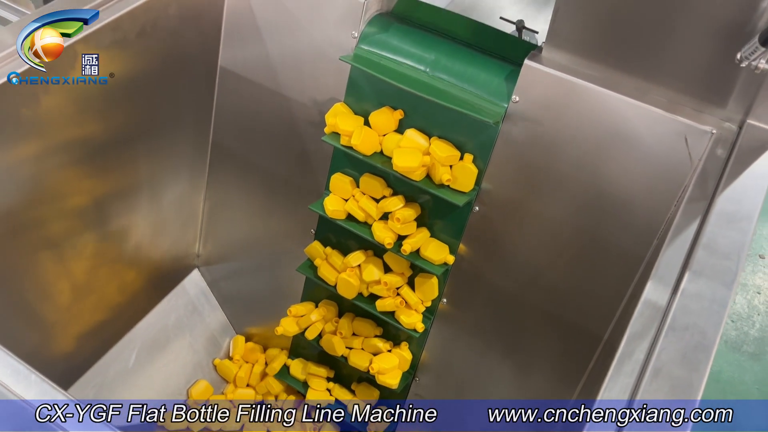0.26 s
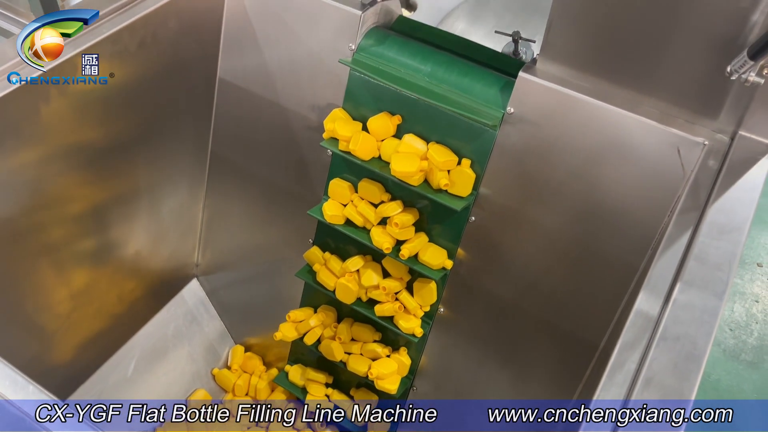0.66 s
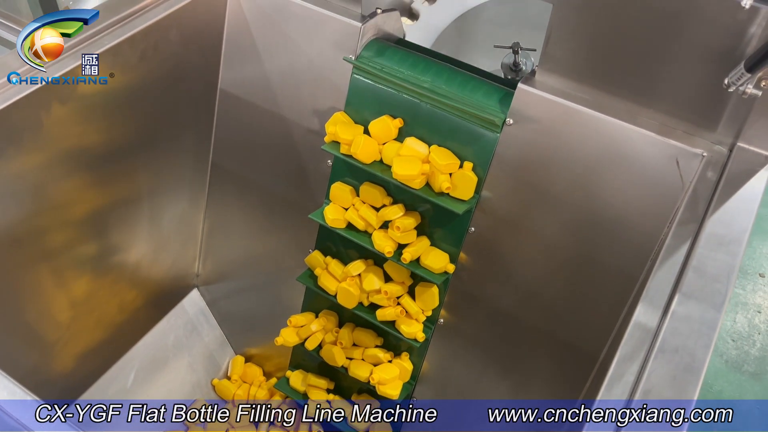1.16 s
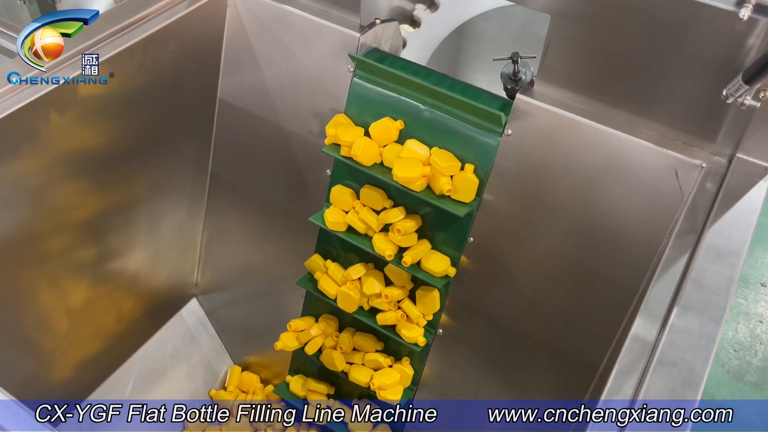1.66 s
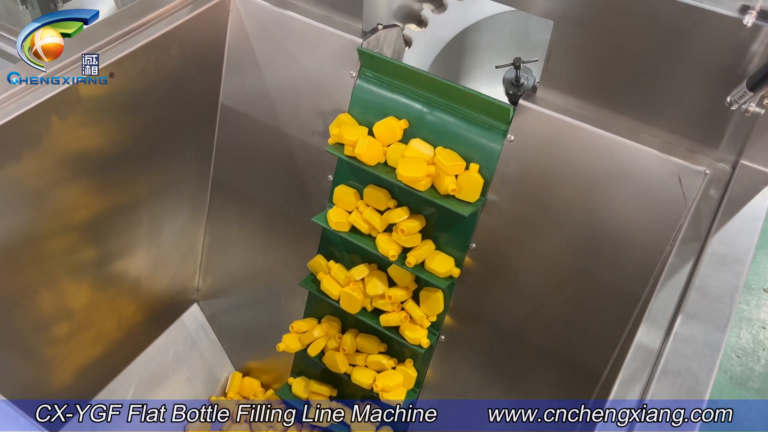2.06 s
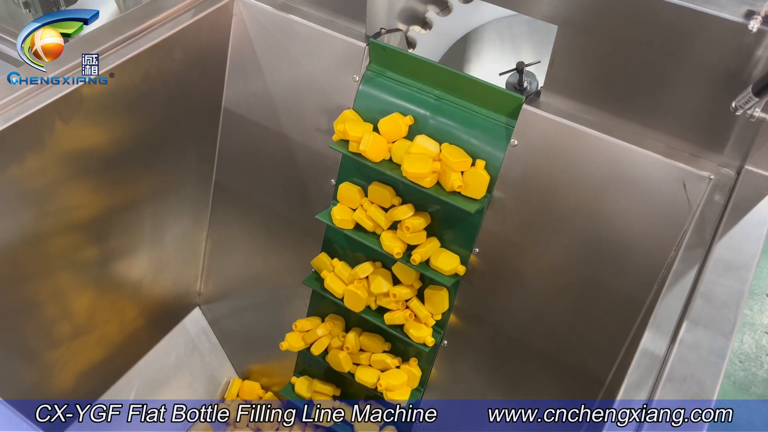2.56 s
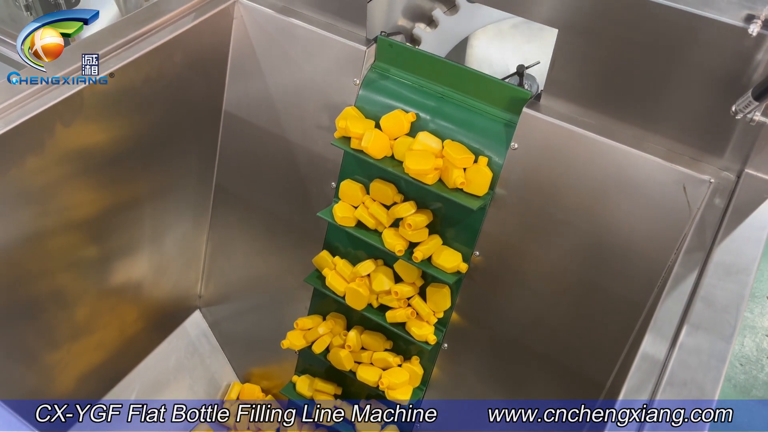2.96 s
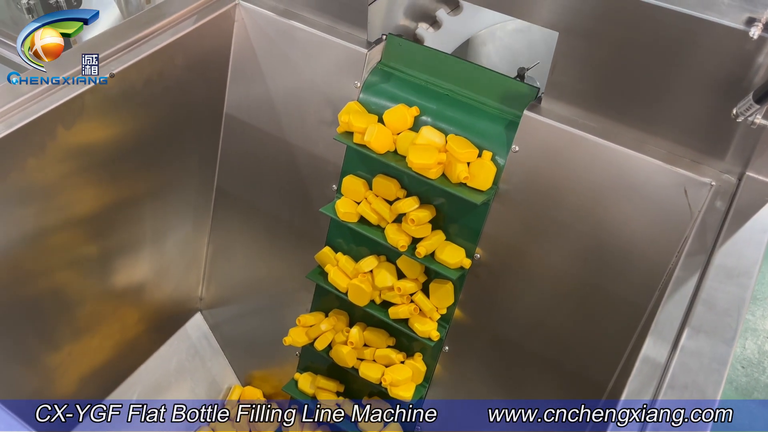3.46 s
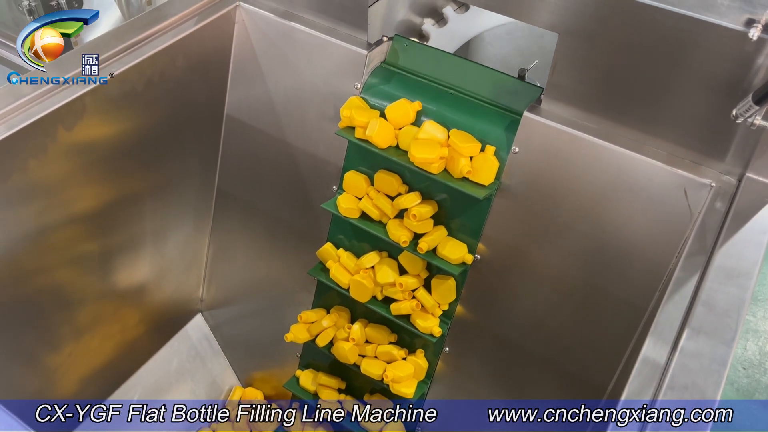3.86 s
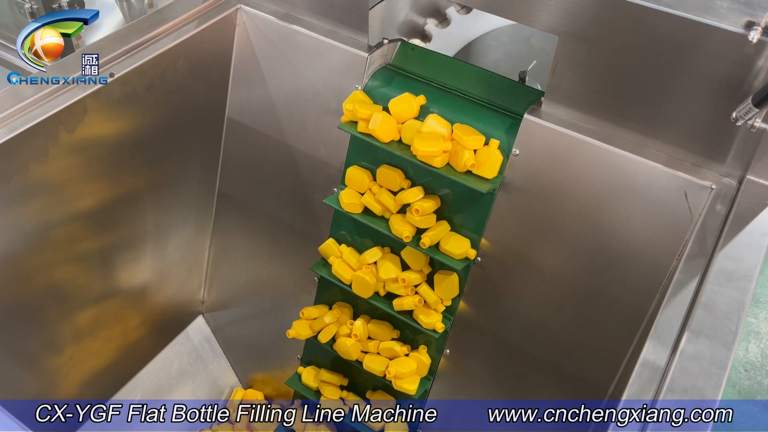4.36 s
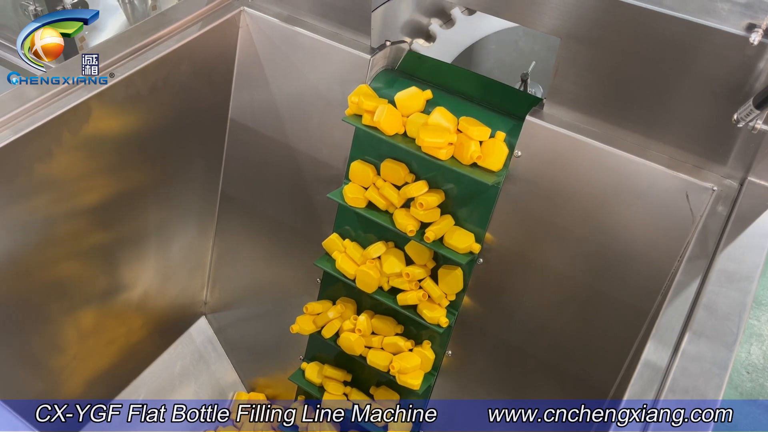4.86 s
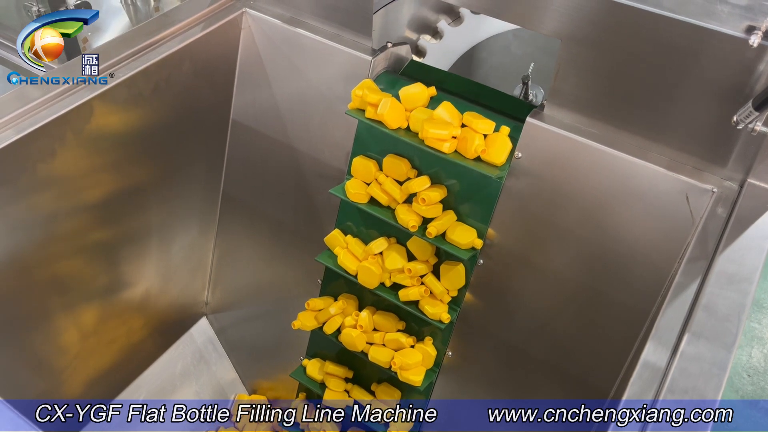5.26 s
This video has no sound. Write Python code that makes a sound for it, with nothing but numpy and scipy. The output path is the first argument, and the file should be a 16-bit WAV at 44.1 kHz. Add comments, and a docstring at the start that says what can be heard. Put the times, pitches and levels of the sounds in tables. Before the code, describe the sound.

Close stereo pickup at a metal hopper: light empty plastic containers knock, click and ring briefly, their heap slipping most strongly in the middle and drumming on the steel walls. Clatter drops away, then returns in a weaker cluster before the end. Behind it are sharp compressed-air hiss, a very high faint whistle for the first two seconds, belt drone and hall rumble.

```python
"""In a factory hall, a cleated belt lifts small plastic bottles out of a steel hopper.
Bottles clack, click and ring as noise grains and decaying sines; the heap slips, most strongly midway,
as a patter of random contacts, drumming on sheet-steel walls that resonate in narrow modes.
Behind them are a belt drone and hall murmur of coloured noise, a drive hum of wavering sines,
and a hiss of compressed air with a thin whistle of narrow-band noise for the first two seconds."""
import sys
import numpy as np
from scipy import signal
from scipy.fft import rfft, irfft, next_fast_len
from scipy.io import wavfile
from scipy.ndimage import map_coordinates

SR = 44100
rng = np.random.default_rng(int(sys.argv[2]) if len(sys.argv) > 2 else 0)


def generate_wav(signal):
    """Clip the signal to [-1, 1] and save it as 16-bit WAV at the path in sys.argv[1]."""
    frames = np.transpose(np.atleast_2d(signal))
    scaled = np.clip(frames, -1, 1) * 32767
    pcm = np.round(scaled).astype(np.int16)
    wavfile.write(sys.argv[1], SR, pcm)


N = 242991  # samples

# Levels are set ahead of the mix; the spectra only shape the tone, as each noise is scaled to rms 1.
# Bottle knocks: start_s, level_db, pitch_hz, ring_db (over the level), body_db (low-mid boost),
# click_db, click_hz
KNOCKS = [(0.186, -18.5, 2290, -1, -11, -33, 3570), (0.312, -12.5, 1656, -2, 4.5, -29, 3400),
          (0.399, -15, 3800, -12, 4, -22, 3870), (0.429, -17, 2690, -2, 6, -28, 3380),
          (0.448, -4, 1460, -7.5, -10, -19, 3530), (0.457, -11, 2076, -1, 15, -40, 3380),
          (0.469, -10.5, 1392, -1.5, 3, -40, 3360), (0.717, -15, 1730, -4.5, 0, -28, 4890),
          (1.084, -25, 1880, -12, 0, -45, 5000), (1.097, -16.5, 2026, -6, 9, -47, 6520),
          (1.403, -21, 1270, -17, -11, -35, 4500), (1.495, -12.5, 830, -5.5, 2, -27, 4040),
          (1.562, -20, 1650, 2, 16, -45, 6910), (1.613, -22.5, 980, 1, 12, -45, 7130),
          (1.768, -15.5, 2113, 7.5, 11, -41, 6850), (1.793, -12, 2800, -6, 22, -38, 6680),
          (1.827, -8.5, 877, -14, -1, -33, 3510), (1.858, -19.5, 2053, 5, -5, -34, 4500),
          (1.919, -8.5, 2474, -5.5, 8, -35, 6570), (1.933, -6, 2820, -9, -3, -22, 4630),
          (1.969, -20, 1015, 3, -10, -26, 6720), (2.031, -13.5, 2730, 4.5, -14, -24, 5860),
          (2.107, -6, 2050, 2.5, 2, -20.5, 4350), (2.132, -14.5, 2547, 2.5, -6, -27, 4400),
          (2.178, -9, 2740, -1, 0, -16.5, 3700), (2.237, -5.5, 2754, 1, -3, -13.5, 5840),
          (2.298, -9, 885, 4, -6, -21, 4960), (2.312, -5.5, 2240, -1, -5, -16, 6640),
          (2.334, -5, 2530, -6, 5, -17, 4130), (2.346, -4.5, 1253, -11, 0, -29, 6800),
          (2.388, -7, 2200, -13, -4, -21, 6600), (2.402, -9.5, 1960, -5, 3, -29, 4800),
          (2.455, -8.5, 2735, -4, -13, -22, 5340), (2.546, -8.5, 2076, 7, 7, -19, 4870),
          (2.577, -1.5, 1430, -21, -3, -19, 3600), (2.655, -10, 2150, -10, 19, -21, 4870),
          (2.68, -5, 2000, -6, 2, -19, 4480), (2.695, -9, 2100, -11, 1, -30, 4520),
          (2.726, -3.5, 2200, -5, -10, -30, 7040), (2.746, -8.5, 2650, 2, 6, -12, 4440),
          (2.797, -6.5, 1050, -10.5, -1, -21, 4000), (2.846, -4, 1260, -20, 8, -21, 3540),
          (2.868, -16, 1440, 0, -8, -38, 4450), (2.908, -13, 2110, 1, 8, -32, 4580),
          (2.923, -4, 1063, -13, 2, -22, 6610), (2.954, -0.5, 877, -18, -0.5, -28, 4940),
          (2.965, -11.5, 2240, 2.5, 1, -18, 4620), (2.982, -16, 907, -1, -9, -16.5, 3480),
          (3.042, -21, 2710, 4, 0, -34, 6070), (3.078, -15, 1113, 1.5, 6, -21, 3600),
          (3.133, -8.5, 1960, -13, -4, -34, 4300), (3.165, -33, 2140, 0, 12, -40, 4940),
          (4.106, -14.5, 2980, -0.5, 12, -26, 5180), (4.133, -12.5, 2180, -3.5, 14, -28, 4100),
          (4.512, -14, 1370, -19, 2, -46, 6480), (4.535, -14, 2130, -5, 20, -23.5, 4630),
          (4.626, -5.5, 2055, -15, 11, -26, 4330), (4.672, -10.5, 2120, -6, 14, -36, 4870),
          (4.735, -18.5, 1434, -13.5, -7, -33, 6720), (4.825, -11.5, 2080, -13, 9.5, -44, 4760),
          (4.853, -15.5, 1390, -9, -3, -28, 3460), (4.9, -16, 2550, -3, 7, -43, 5580),
          (4.935, -19, 2620, -5, 5, -44, 4950), (5.006, -22, 2000, -3, 25, -37, 4550),
          (5.046, -21.5, 1680, 2, 19, -28, 4950), (5.067, -21.5, 1437, -2.5, -7, -38, 4890),
          (5.279, -23.5, 1470, -11, 15, -30, 6400)]
# Bottles rocking on the steel: start_s, length_s, pitch_hz, contact_db (centre of a random spread)
RATTLES = [(.53, .16, 1437, -35.5), (2.029, .045, 2680, -20), (2.178, .04, 2690, -11.5),
           (2.18, .16, 915, -24.5), (2.657, .08, 2080, -14), (3.118, .07, 912, -17.5),
           (3.132, .055, 2070, -20), (3.135, .06, 2570, -23.5), (4.904, .08, 2625, -33)]
# Slips of the heap: start_s, length_s, motion_db
SLIPS = [(0.49, 0.3, -37.5), (1.548, 0.62, -30), (1.757, 0.37, -23), (2.135, 0.68, -20.5),
         (2.302, 0.12, -19.5), (2.556, 0.23, -18.5), (2.819, 0.17, -19.5), (3.017, 0.1, -24.5),
         (3.327, 0.083, -36.5), (3.99, 0.086, -34), (4.619, 0.12, -29), (4.84, 0.26, -32)]
# Clumps landing on the hopper wall: start_s, level_db, sheet_hz, ring_db
LANDINGS = [(0.315, -31.5, 256.7, -30.5), (0.452, -36, 253, -58), (0.723, -31.5, 107, -26),
            (1.57, -25.5, 234, -30.5), (1.829, -19, 224, -40), (1.92, -27, 192, -26),
            (2.355, -18.5, 394, -21.5), (2.588, -18.5, 258, -20.5), (2.861, -19.5, 232, -35),
            (2.95, -16, 408, -20), (3.126, -26.5, 397, -28), (4.644, -25.5, 260.4, -24),
            (4.845, -27, 256.4, -25), (5.058, -27.5, 255.7, -25)]
# Body modes of the empty bottles: pitch_hz, level_db (relative)
BOTTLE_MODES = [(900, 2), (1070, 0), (1290, 1.5), (1480, 5), (1940, 2.5), (2090, 7), (2200, 1), (2720, 5.5)]
# Ringing modes of the hopper's steel sheets: pitch_hz, level_db (ahead of the hopper's gain)
STEEL_MODES = [(160, -51), (188, -38), (234, -40.5), (260, -37), (394, -48), (490, -45), (657, -45),
               (1070, -42), (1155, -44), (1197, -41.5), (1252, -44), (1323, -42.5), (1451, -43),
               (2089, -55), (2443, -42)]
# Tone of the plastic shells: freq_hz, level_db
CLACK_SPECTRUM = [(240, -45), (450, -0.5), (820, 2), (1050, -1.5), (1400, 1), (1700, 1), (2100, 2.5),
                  (2800, 2.5), (3500, -5.5), (5000, -6), (7500, -21), (12000, -3.5)]
# Tone of necks and rims meeting: freq_hz, level_db
EDGE_SPECTRUM = [(2000, -10), (3300, 20), (5000, 12.5), (7200, 5), (9000, 7.5), (13000, -19)]
# Tone of bottles tapping each other: freq_hz, level_db
CLATTER_SPECTRUM = [(260, -11.5), (450, -16), (600, -4), (900, 4.5), (1400, -1), (1700, 4), (2100, 4),
                    (2400, 0.5), (2750, 2.5), (3500, -4), (5000, -10.5), (7000, -5.5), (12000, -131)]
# Tone of the broad hopper walls: freq_hz, level_db
DRUM_SPECTRUM = [(30, -12), (55, -3), (80, -6), (120, -3), (250, 1.5), (320, -5), (420, 4), (600, -19.5),
                 (1000, -24)]
# Left level over right for sounds in the hopper: freq_hz, level_db
LEAN = [(70, 0), (130, .5), (280, -.7), (550, -1), (1200, -3.3), (2000, 0), (4000, .9)]
# Likeness of left and right in stereo noise: freq_hz, correlation (-1 to 1)
ALIKE = [(90, 1), (160, 1), (290, 0.99), (640, 0.43), (1400, 0.21), (2300, 0.91), (3500, 0.5),
         (5500, 0.037), (10000, 0.077)]
# Decay of the hall's answer: freq_hz, t60_s
ROOM_DECAY = [(100, 0.89), (260, 0.3), (700, 0.41), (1800, 0.3), (5000, 0.16)]
# Drone of the belt over time: time_s, level_db
BELT_LEVEL = [(0, -47.5), (1.4, -53.5), (3.3, -41.5), (3.9, -41), (4.4, -48), (5.1, -43), (5.5, -49.5)]
# Tone of the belt: freq_hz, level_db
BELT_SPECTRUM = [(150, -48), (205, -8), (255, -1.5), (285, -2), (320, -3), (365, -9.5), (400, -29),
                 (640, -10), (900, -17), (1500, -52)]
# Drive motor and gearbox: pitch_hz, level_db (ahead of a small trim and wobble)
HUM = [(102, -51), (260, -48.5), (317, -50), (614, -54), (1130, -63), (1437, -61)]
# Tone of the hall's rumble: freq_hz, level_db
HALL_SPECTRUM = [(30, -24), (54, -3.5), (82, -6), (105, 4), (140, -5.5), (190, -10), (245, -4.5), (320, -2),
                 (390, -10.5), (470, -8.5), (560, -23.5), (1000, -17.5), (2000, -80)]
# Tone of the hall's far hiss: freq_hz, level_db
FAR_HISS_SPECTRUM = [(400, -35), (900, -8.5), (1400, 7.5), (1750, -2), (2400, 1.5), (3700, 1), (5000, 7),
                     (7000, 6), (9000, 0), (12000, -15)]
# Air leak over time: time_s, hiss_db
AIR_LEVEL = [(0, -26), (.6, -24.5), (2, -24), (2.4, -25), (3.3, -26), (5.5, -25.8)]
# Edge tone of the leak over time: time_s, level_db
WHISTLE_LEVEL = [(0, -46), (.35, -38), (1.2, -38), (2.05, -37), (2.2, -64)]
# Tone of the air jet: freq_hz, level_db
HISS_SPECTRUM = [(4000, -58), (6500, -7.5), (8300, 3), (10000, 6), (12000, 7), (14000, 10.5), (15500, 2.5)]
# Phase lead of right over left in the jet, which is off to one side:
# freq_hz, early_rad, late_rad (the top of the hiss is narrow at first, then wide)
JET_PHASE = [(4700, 0, 0), (7000, 1.4, 1.4), (8400, 2.7, 3.1), (10000, 4.7, 4.7), (11800, 6.1, 6.3),
             (13000, 6.9, 7), (14200, 6.4, 7.9), (15500, 6.3, 9.3)]

# Knocks: centre and width of the body added by a flat-on blow
BODY_HZ, BODY_OCTAVES = 704, 0.74
# Rebounds of a struck bottle: count after the first contact, mean gap, loss at each
CHATTER_COUNT, CHATTER_GAP_S, CHATTER_LOSS_DB = 2, .005, 5
# A ring at RING_HZ lasts RING_T60_S; higher ones die sooner
RING_HZ, RING_T60_S = 2100, .065
# Rocking bottles: mean gap between contacts, decay of each
ROCK_GAP_S, ROCK_T60_S = .017, 0.053
# Heap: patter and drumming relative to its motion, and its motion at rest
SLIDE_PATTER_DB, SLIDE_DRUM_DB, REST_DB = 2, -13, -44
# A slip gathers speed, slows as the bottles pack, and stops
SLIP_RISE_S, SLIP_SAG_DB_PER_S, SLIP_STOP_S = 0.0035, 1.5, 0.016
# Neighbours unsettled by a knock: share, rise, t60, and lead ahead of the knock
JOSTLE_DB, JOSTLE_RISE_S, SETTLE_T60_S, LEAD_S = -8.5, 0.014, 0.24, 0.013
# Wall thumps relative to the levels of the knocks and landings
THUMP_DB, LANDING_DB = -29, -6
# Decay and swell of a struck sheet
SHEET_T60_S, SHEET_RISE_S = 0.44, 0.006
# Width of a steel mode: a fixed part plus a share of its pitch
MODE_WIDTH_HZ, MODE_LOSS = 5, .005
# Hall: centre of the rumble's level, start of the far hiss and its slow rise
HALL_DB, WASH_DB, WASH_DB_PER_S = -41.5, -38.3, .55
# Breathy band around the whistle, its level over the tone
WHISTLE_HZ, SKIRT_HZ, SKIRT_WIDTH_HZ, SKIRT_DB = 15172, 15000, 600, 4
# The top of the hiss widens in stereo between these times
WIDEN_START_S, WIDEN_END_S = 1.98, 2.07
TOP_HZ = 15720  # upper limit of the whole sound


def amp(db):
    """Decibels to gain."""
    return 10 ** (np.asarray(db) / 20)


def unit(x):
    """Scale to rms 1."""
    return x / np.sqrt(np.mean(x ** 2) + 1e-20)


def along(points, hz):
    """Read (frequency, value) points on a log frequency axis."""
    f, v = np.transpose(points)
    return np.interp(np.log(hz + 1), np.log(f), v)


def curve(rows):
    """Draw (time, level) points as one level per sample."""
    s, level = np.transpose(rows)
    return np.interp(np.arange(N) / SR, s, level)


def wobble(rate):
    """A smooth random curve with rate knots a second."""
    knots = rng.standard_normal(int(N * rate / SR) + 4)
    return map_coordinates(knots, [np.arange(N) * rate / SR])


def filtered(x, response):
    """Multiply the spectrum of x by a response of frequency."""
    m = next_fast_len(N + SR)
    return irfft(rfft(x, m) * response(np.fft.rfftfreq(m, 1 / SR)), m)[..., :N]


def noise(spectrum):
    """Coloured stereo noise of rms 1, near mono in the bass."""
    def shape(hz):
        turn = np.arccos(np.clip(along(ALIKE, hz), -1, 1)) / 2
        return amp(along(spectrum, hz)) * np.array([np.cos(turn), np.sin(turn)])
    mid, side = filtered(rng.standard_normal((2, N)), shape)
    return unit(np.array([mid + side, mid - side]))


def bursts(times, sizes, t60, attack):
    """Envelope of blows whose energies add up and die away."""
    t = np.arange(SR // 2) / SR
    places = np.clip(times * SR, 0, N - 1).astype(int)
    blows = np.bincount(places, sizes ** 2, N)
    fall = amp(-60 * t / t60) * (1 - np.exp(-t / attack))
    return np.sqrt(np.abs(signal.fftconvolve(blows, fall ** 2)[:N]))


def contacts(count, scatter_db, t60):
    """Envelope of rms 1 made of many small random contacts."""
    times = (np.arange(count) + rng.random(count)) / count * N / SR
    sizes = amp(scatter_db * (2 * rng.random(count) - 1))
    return unit(bursts(times, sizes, t60, attack=0.00033))


def chatter(t, t60, attack):
    """Envelope of one knock: a sharp first contact and a few weaker rebounds."""
    gaps = CHATTER_GAP_S * rng.uniform(.5, 1.5, CHATTER_COUNT)
    age = np.maximum(t - np.cumsum([0, *gaps])[:, None], 0)
    loss = CHATTER_LOSS_DB * np.arange(len(age))[:, None]
    hits = amp(-loss - 60 * age / t60) * (1 - np.exp(-age / attack))
    return np.linalg.norm(hits, axis=0)


def clacks(tail_t60=0.18, tail_db=-17, tick_db=-8.0, focus_db=7, octaves=1.0):
    """Noise grains stand for a thin shell's many short modes, strongest near its pitch; rebounds follow."""
    size = SR // 4
    t, hz = np.arange(size) / SR, np.fft.rfftfreq(size, 1 / SR)
    tail = amp(tail_db - 60 * t / tail_t60) * (1 - np.exp(-t / 0.027))

    def hump(centre, width):
        return np.exp(-(np.log2((hz + 1) / centre) / width) ** 2)

    modes, shell = noise(CLACK_SPECTRUM), np.zeros((2, N + size))
    rebounds = contacts(count=800, scatter_db=7, t60=.035)
    for s, db, pitch, _, body_db, _, _ in KNOCKS:
        colour = amp(focus_db * hump(pitch, octaves) + body_db * hump(BODY_HZ, BODY_OCTAVES))
        shake = rfft(modes[:, rng.integers(N - size):][:, :size])
        grain = unit(irfft(shake * colour, size))
        ticks = amp(tick_db) * chatter(t, t60=.07, attack=.0016)
        rattling_tail = tail * rebounds[rng.integers(N - size):][:size]
        shell[:, round(s * SR):][:, :size] += amp(db) * np.hypot(ticks, rattling_tail) * grain
    return shell[:, :N]


def clicks(crack_db=-2, ping_db=-8):
    """Hard necks and rims meet: a bright crack and brief high modes, different at every knock."""
    size = SR // 8
    t = np.arange(size) / SR
    edge, out = noise(EDGE_SPECTRUM), np.zeros((2, N + size))
    for s, *_, db, hz in KNOCKS:
        crack = chatter(t, t60=.048, attack=.001) * edge[:, rng.integers(N - size):][:, :size]
        pitches = hz * (1 + .12 * rng.standard_normal((3, 1)) * [[0], [1], [1]])
        cycles = pitches * t + rng.random((2, 3, 1))
        ping = amp(-60 * t / .065) * np.sin(2 * np.pi * cycles).sum(axis=1)
        out[:, round(s * SR):][:, :size] += amp(db) * (amp(crack_db) * crack + amp(ping_db) * ping)
    return out[:, :N]


def bottle_rings(attack=0.00075, spread=0.022):
    """The struck bottle rings at its own pitch, its neighbours at nearly the same."""
    out, t = np.zeros((2, N + SR)), np.arange(SR // 3) / SR
    for s, db, hz, ring_db, *_ in KNOCKS:
        t60 = RING_T60_S * np.sqrt(RING_HZ / hz)
        pitches = hz * (1 + spread * rng.standard_normal((3, 1)) * [[0], [1], [1]])
        phases = rng.uniform(0, 2 * np.pi, (3, 1)) + 0.2 * rng.standard_normal((2, 3, 1))
        ring = (np.sin(2 * np.pi * pitches * t + phases) * [[1], [.45], [.45]]).sum(axis=1)
        fall = amp(db + ring_db - 4.5 - 60 * t / t60) * (1 - np.exp(-t / attack))
        out[:, round(s * SR):][:, :len(t)] += fall * ring
    return out[:, :N]


def rattles(attack=.001, spread=0.017):
    """A bottle rocks on the steel: quick uneven contacts keep one of its modes ringing."""
    out, t = np.zeros((2, N + SR)), np.arange(SR // 8) / SR
    fall = amp(-60 * t / ROCK_T60_S) * (1 - np.exp(-t / attack))
    for start, length, hz, db in RATTLES:
        times = start + ROCK_GAP_S * np.cumsum([0, *rng.uniform(.5, 1.5, size=15)])
        draws = rng.standard_normal((len(times), 4))
        for s, (detune, size_db, phase, skew) in zip(times, draws):
            if s < start + length:
                pitch = hz * (1 + spread * detune)
                stereo_phase = skew * np.array([[.5], [-.5]])
                ring = np.sin(2 * np.pi * (pitch * t + phase) + stereo_phase)
                out[:, round(s * SR):][:, :len(t)] += amp(db + size_db) * fall * ring
    return out[:, :N]


def sliding():
    """How strongly the heap moves: it gives way in a run of slips."""
    motion = np.full(N, amp(REST_DB))
    for start, length, db in SLIPS:
        t = np.maximum(np.arange(N) / SR - start, 0)
        rise = 1 - np.exp(-t / SLIP_RISE_S)
        stop = np.exp(-np.maximum(t - length, 0) / SLIP_STOP_S)
        motion = np.hypot(motion, amp(db - SLIP_SAG_DB_PER_S * t) * rise * stop)
    return motion


def small_rings(count, t60, spread, scatter_db):
    """Light touches, each ringing one mode of a bottle; rms 1."""
    t = np.arange(SR // 10) / SR
    hz, db = np.array(BOTTLE_MODES)[rng.integers(len(BOTTLE_MODES), size=count)].T[:, :, None]
    start = ((np.arange(count) + rng.random(count)) / count * N).astype(int)[:, None]
    pitch = hz * np.exp(spread * rng.standard_normal((count, 1)))
    touch_db = db + scatter_db * (2 * rng.random((count, 1)) - 1)
    fall = amp(touch_db - 60 * t / t60) * (1 - np.exp(-t / 0.002))
    places = (start + np.arange(len(t))).ravel()

    def channel():
        phase = 0.23 * rng.standard_normal((count, 1))
        rings = fall * np.sin(2 * np.pi * pitch * t + phase)
        return np.bincount(places, rings.ravel())[:N]

    return unit(np.array([channel(), channel()]))


def tumble():
    """Bottles tap each other while the heap slides and around each knock."""
    s, db, *_ = np.transpose(KNOCKS)
    unsettled = bursts(s - LEAD_S, amp(db + JOSTLE_DB), t60=SETTLE_T60_S, attack=JOSTLE_RISE_S)
    taps = contacts(count=600, scatter_db=6, t60=0.06)
    patter = amp(-7.5) * taps * noise(CLATTER_SPECTRUM)
    hollow = amp(-11.5) * small_rings(count=900, t60=0.049, spread=0.032, scatter_db=7.5)
    return np.hypot(amp(SLIDE_PATTER_DB) * sliding(), unsettled) * (patter + hollow)


def drumming():
    """Knocks, landing clumps and the sliding heap thump the hopper's broad walls."""
    s, db, *_ = np.transpose(KNOCKS)
    landing_s, landing_db, *_ = np.transpose(LANDINGS)
    thumps = bursts(s, amp(db + THUMP_DB), t60=0.3, attack=0.0029)
    booms = bursts(landing_s, amp(landing_db + LANDING_DB), t60=0.71, attack=0.00089)
    rumble = amp(SLIDE_DRUM_DB) * sliding() * contacts(count=260, scatter_db=11, t60=0.079)
    drive = np.sqrt(thumps ** 2 + booms ** 2 + rumble ** 2)
    # roll off the lowest bass
    return filtered(drive * noise(DRUM_SPECTRUM), lambda f: f ** 4 / (f ** 4 + 45 ** 4))


def hopper(drive, gain_db=42.5):
    """The steel sheets ring on in narrow resonances, the higher ones more damped."""
    def response(f):
        total = 0
        for hz, db in STEEL_MODES:
            damping = 1j * f * (MODE_WIDTH_HZ + MODE_LOSS * hz)
            total = total + amp(db + gain_db) * damping / (hz * hz - f * f + damping)
        return total
    return filtered(drive, response)


def sheet_rings():
    """Each landing clump sets one steel sheet ringing on a single decaying note."""
    out, t = np.zeros(N + SR), np.arange(SR) / SR
    for s, _, hz, db in LANDINGS:
        envelope = amp(db - 60 * t / SHEET_T60_S) * (1 - np.exp(-t / SHEET_RISE_S))
        out[round(s * SR):][:SR] += envelope * np.sin(2 * np.pi * hz * t)
    return out[:N]


def placed(x):
    """Lean the hopper's stereo sound by frequency, towards the right in the mids."""
    return filtered(x, lambda f: amp(along(LEAN, f) * np.array([[.5], [-.5]])))


def room(x):
    """The hall answers with decaying noise, longer in the bass."""
    hz, t, z = signal.stft(rng.standard_normal((2, SR)), SR, nperseg=256)
    fall = amp(-60 * t / along(ROOM_DECAY, hz)[:, None])
    tail = signal.istft(z * fall, SR, nperseg=256)[1]
    left, right = signal.fftconvolve(x, tail / np.linalg.norm(tail[0]), axes=1)[:, :N]
    # long waves reach both sides alike
    side = filtered((left - right) / 2, lambda f: f / np.hypot(f, 1400))
    return (left + right) / 2 + np.array([side, -side])


def belt():
    """The loaded belt drones low, as coloured noise, dragging up its steel bed."""
    return amp(curve(BELT_LEVEL)) * noise(BELT_SPECTRUM)


def machinery():
    """The drive hums in sines of unsteady level and phase over the hall's rumble and far hiss."""
    t = np.arange(N) / SR
    hum = 0
    for hz, db in HUM:
        level = amp(db - 1 + 2.5 * wobble(6))
        hum = hum + level * np.sin(2 * np.pi * hz * t + 1.3 * wobble(11))
    rumble = amp(HALL_DB + 2.4 * wobble(7)) * noise(HALL_SPECTRUM)
    wash = amp(WASH_DB + WASH_DB_PER_S * t + 0.45 * wobble(34)) * noise(FAR_HISS_SPECTRUM)
    return hum + rumble + wash


def air_leak():
    """Compressed air hisses as turbulent noise; a breathy edge tone whistles for the first two seconds."""
    # weak reflections from nearby walls comb the hiss
    delays = rng.uniform(0.001048, 0.022, size=8)
    hz, early, late = np.transpose(JET_PHASE)

    def heard(lead):
        def response(f):
            walls = 1 + .17 * np.exp(-2j * np.pi * f * delays[:, None]).sum(axis=0)
            sides = np.exp(.5j * np.interp(f, hz, lead) * np.array([[-1], [1]]))
            return amp(along(HISS_SPECTRUM, f)) * walls * sides
        return unit(filtered(rng.standard_normal(N), response))

    def band(centre, width):
        return unit(filtered(rng.standard_normal(N), lambda f: np.exp(-((f - centre) / width) ** 2)))

    widen = np.interp(np.arange(N) / SR, (WIDEN_START_S, WIDEN_END_S), [0, 1])
    jet = np.sqrt(1 - widen) * heard(early) + np.sqrt(widen) * heard(late)
    whistle = band(WHISTLE_HZ, 40) + amp(SKIRT_DB) * band(SKIRT_HZ, SKIRT_WIDTH_HZ)
    hiss = amp(curve(AIR_LEVEL) + .35 * wobble(14)) * jet
    return hiss + amp(curve(WHISTLE_LEVEL)) * whistle


def scene():
    """Bottles in the hopper, the hall around them, the machines behind."""
    bottles = clacks() + clicks() + bottle_rings() + rattles() + tumble() + drumming()
    near = bottles + hopper(bottles) + sheet_rings()
    hopper_in_hall = placed(amp(-1.5) * near + amp(-6.0) * room(near))
    return hopper_in_hall + belt() + machinery() + air_leak()


def record(dry):
    """Cut everything at and above the band limit."""
    return filtered(dry, lambda hz: hz < TOP_HZ)


dry = scene()
out = record(dry)
generate_wav(out)
```